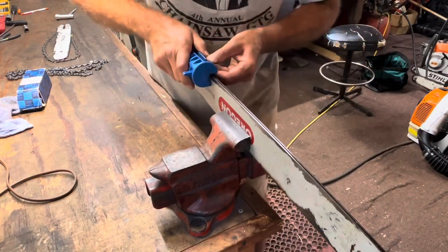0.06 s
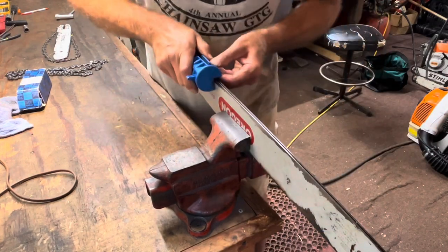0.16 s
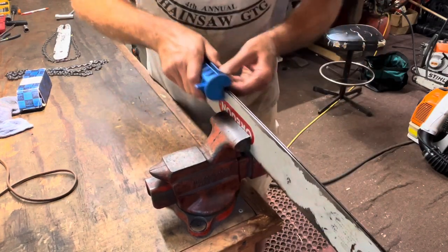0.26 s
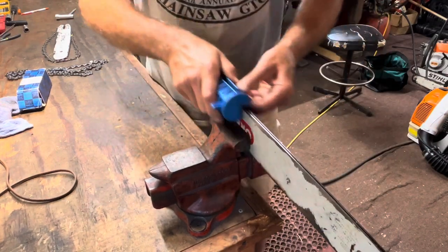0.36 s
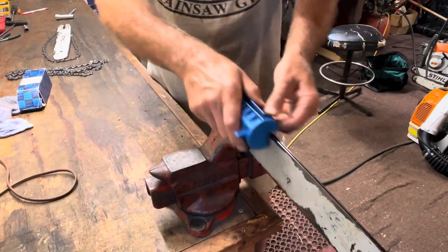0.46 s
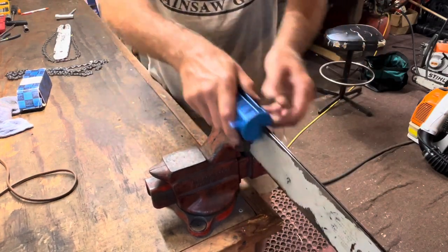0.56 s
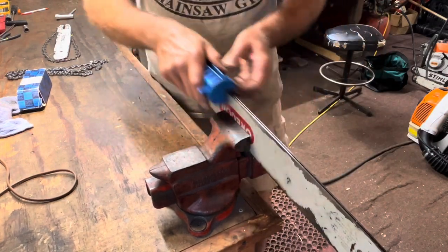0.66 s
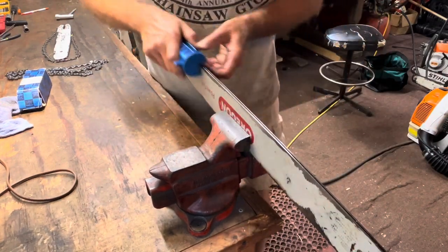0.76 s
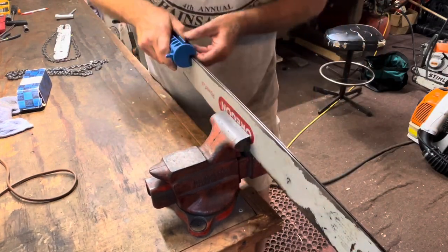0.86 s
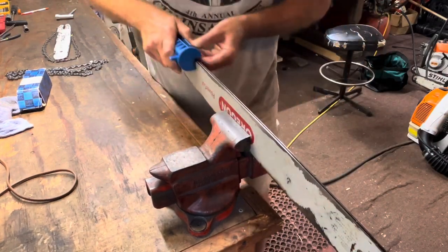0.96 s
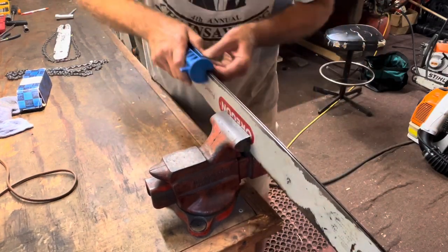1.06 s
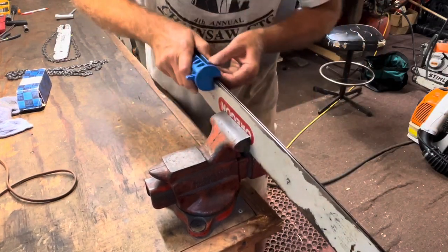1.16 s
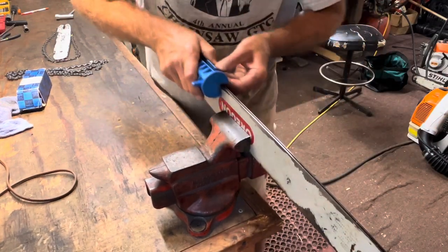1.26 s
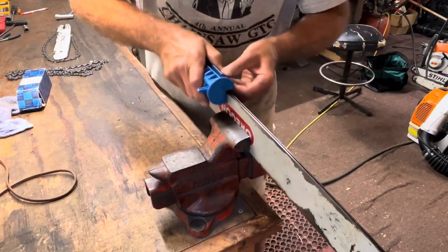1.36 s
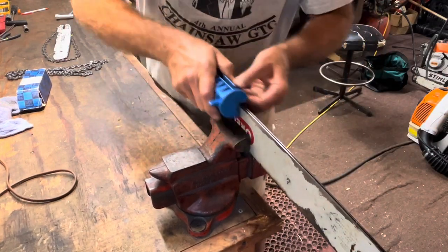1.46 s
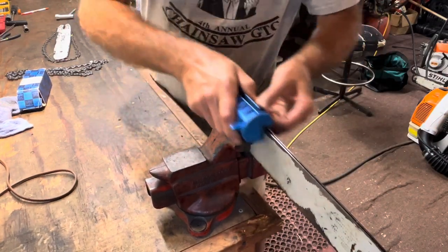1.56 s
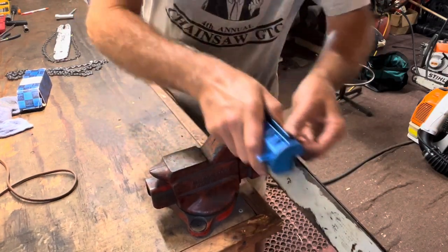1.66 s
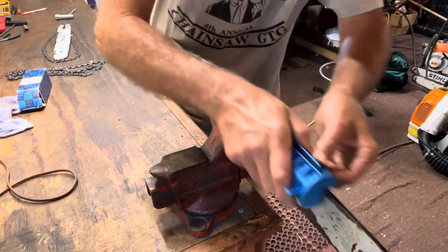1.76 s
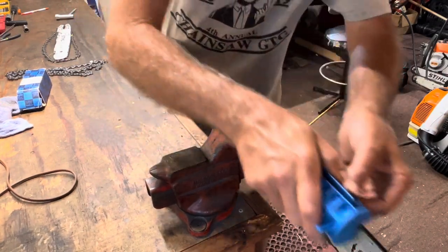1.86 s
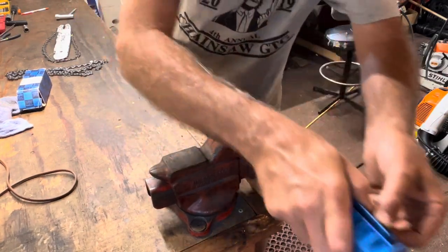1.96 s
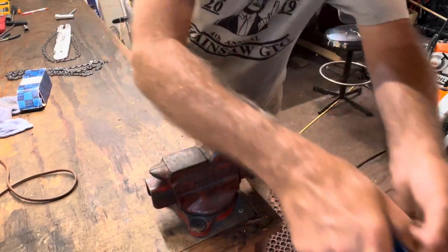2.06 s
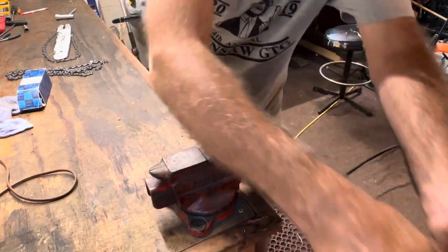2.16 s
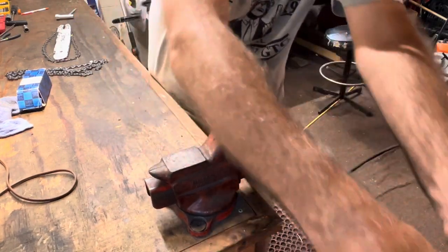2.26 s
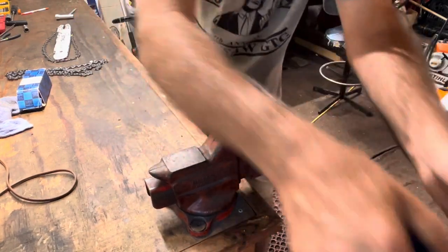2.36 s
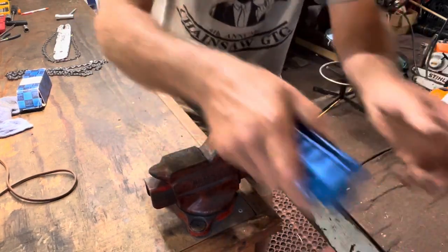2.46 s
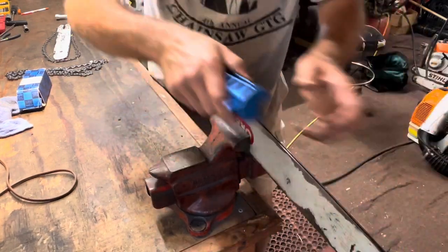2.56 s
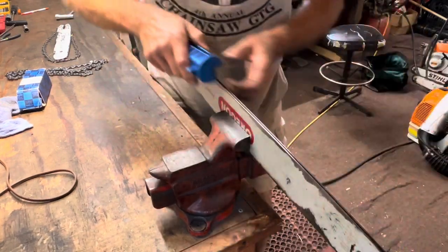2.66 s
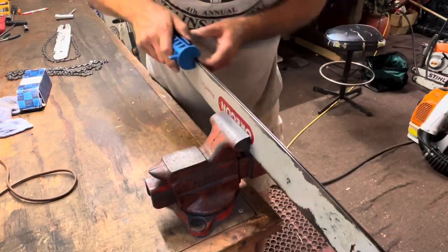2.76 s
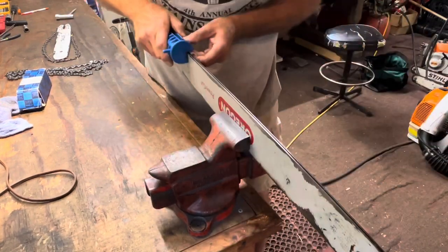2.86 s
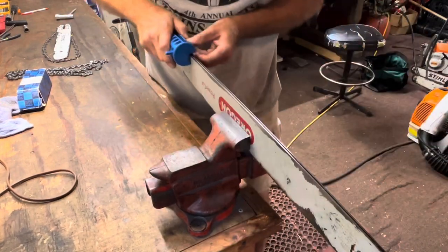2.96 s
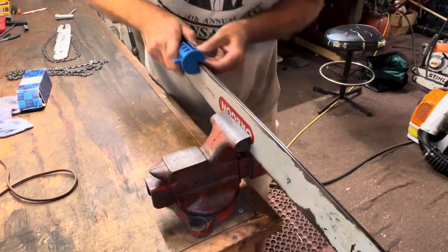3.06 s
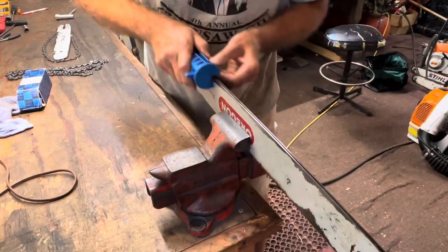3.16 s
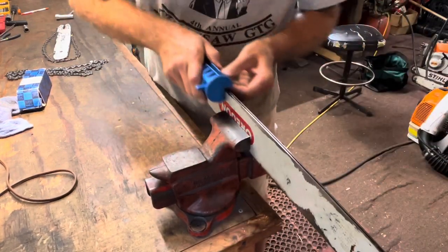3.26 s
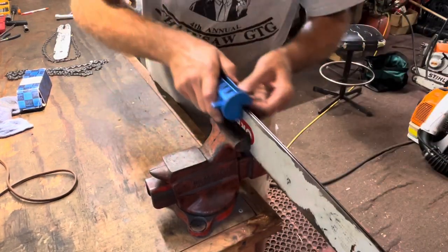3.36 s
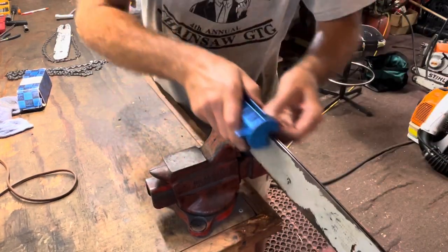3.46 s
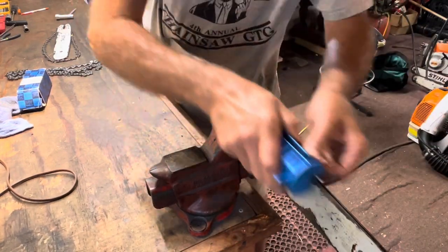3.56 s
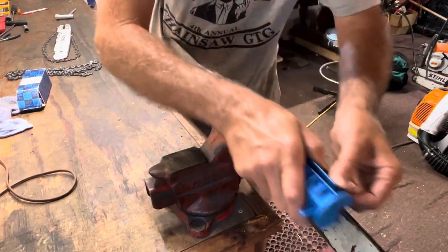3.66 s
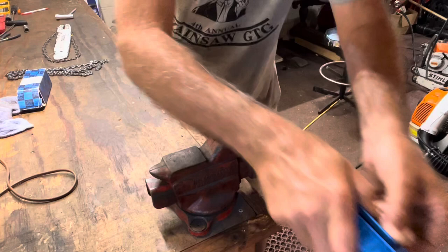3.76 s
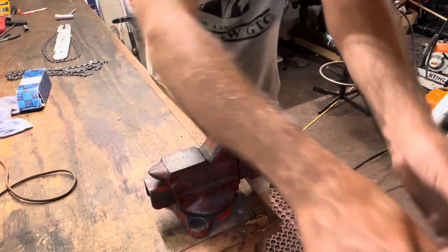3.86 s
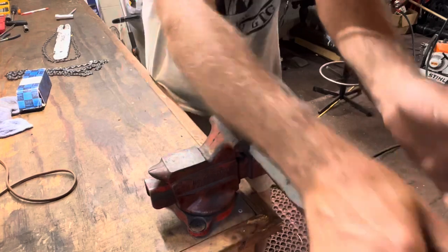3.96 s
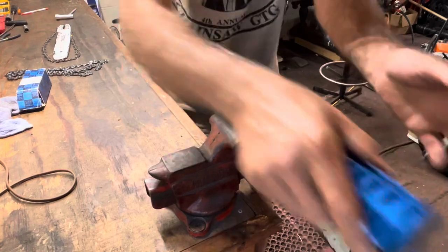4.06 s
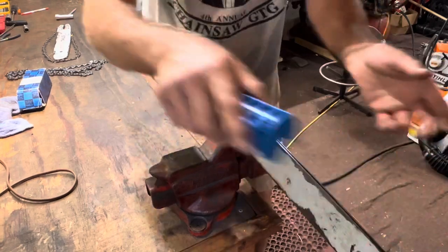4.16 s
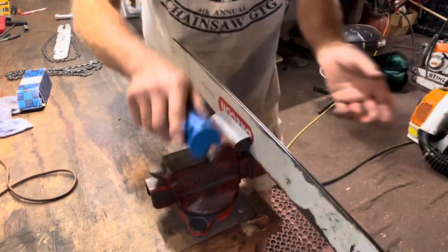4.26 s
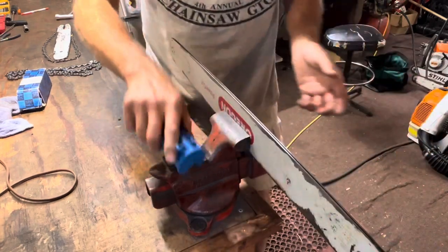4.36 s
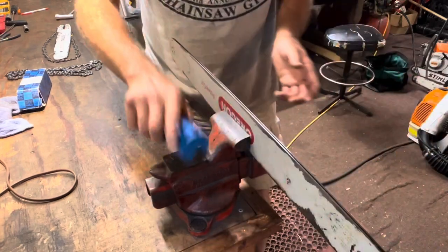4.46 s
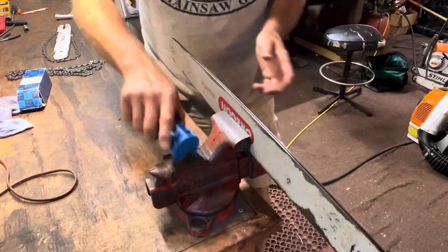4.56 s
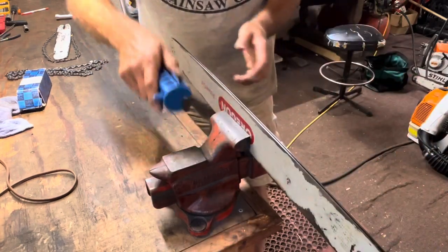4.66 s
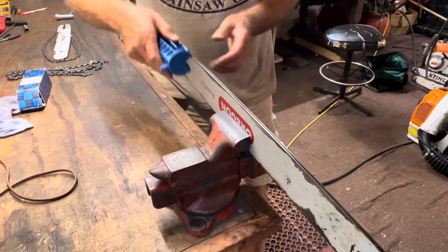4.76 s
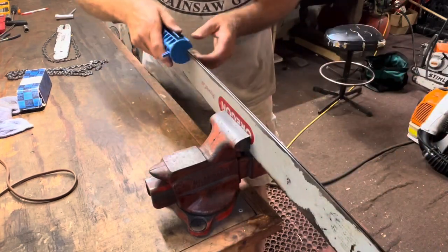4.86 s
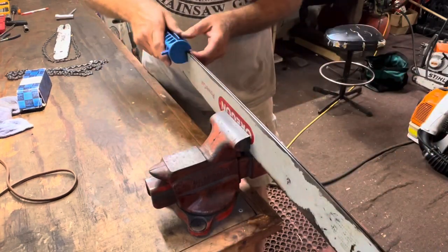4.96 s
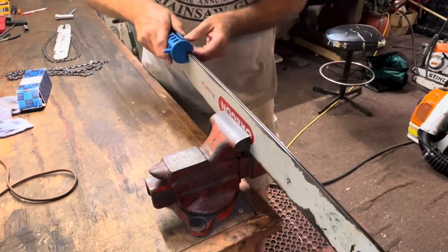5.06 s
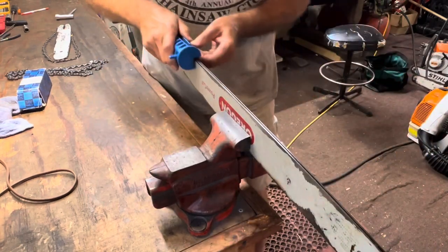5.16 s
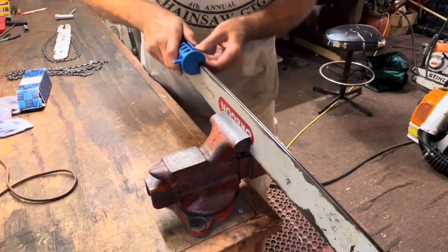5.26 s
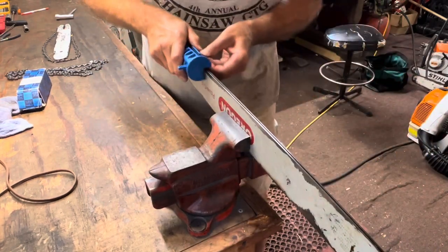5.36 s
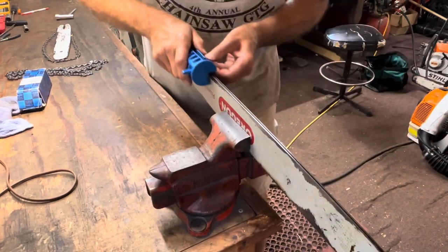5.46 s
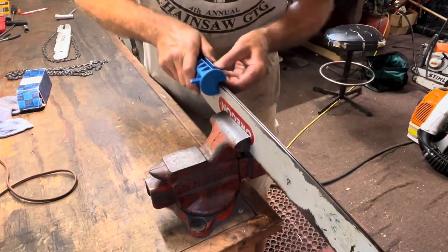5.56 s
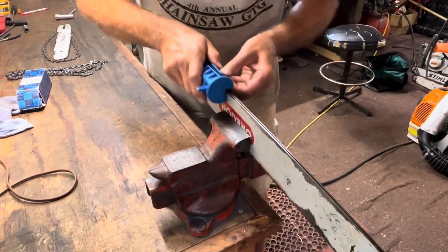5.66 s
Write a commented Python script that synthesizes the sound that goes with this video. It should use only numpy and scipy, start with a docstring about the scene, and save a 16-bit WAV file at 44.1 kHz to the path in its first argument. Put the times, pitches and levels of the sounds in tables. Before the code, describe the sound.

A file in a plastic jig rasps along a clamped chainsaw bar in short rubs and two long strokes, then knocks sharply twice on a vice.

```python
"""A file rasps in short rubs amid the drone of a small workshop, squealing where it skids without cutting.
Two long strokes follow; then its plastic jig is knocked twice on a bench vice and set back on the bar.
The jig is pushed along the edge of a chainsaw bar clamped in the vice, and a phone listens.
Random clicks make the teeth, wavering sines the squeals and hum, and impulses strike steel, jig and
bench, each a set of fading tones. Filtered noise makes the air and the rumble of the bench."""
import sys
import numpy as np
from scipy import signal
from scipy.fft import rfft, irfft
from scipy.io import wavfile
from scipy.ndimage import map_coordinates

SR = 44100
rng = np.random.default_rng(int(sys.argv[2]) if len(sys.argv) > 2 else 0)


def wrap_up_sound(samples):
    """Save the sound to the file named by the first command line argument, as 16-bit audio."""
    columns = np.atleast_2d(samples).T
    # keep every value between -1 and 1, then stretch to whole-number steps
    tamed = np.clip(columns, -1, 1)
    steps = np.round(tamed * 32767).astype(np.int16)
    wavfile.write(sys.argv[1], SR, steps)


N = 250968
TIME = np.arange(N) / SR
SIZE = 2 ** 19  # samples in each Fourier transform
FREQ = np.arange(SIZE // 2 + 1) * SR / SIZE

# Where the jig is. Each row: time in seconds, place along the bar from 0 (far end) to 1 (near end).
JIG_PLACE = [(.25, 0.24), (.5, 0.44), (.8, 0.14), (1.6, 0.31), (1.9, 0.66), (2.25, 0.92), (2.75, 0.077),
             (3.25, 0.35), (3.8, 0.64), (4.3, 0.065)]
# The jig taps the bar or hits the vice and chatters. Each row: time in seconds, drive of the crack in dB,
# drive of the bench thud in dB, drive of the plastic clack in dB, ring of the struck spot in Hz.
JIG_KNOCKS = [(0.917, -31, -45, -60, 2570), (2.444, -50, -56, -86.5, 3690), (2.823, -21.5, -54, -58, 3530),
              (2.835, -37, -45, -33, 2570), (3.974, -60.5, -42, -70, 2500), (4.246, -40.5, -74, -73, 3050),
              (4.3117, 2.5, -25, -33, 3156), (4.3142, -7.5, -44, -31.5, 2240),
              (4.3269, -12, -35, -37, 3280), (4.3331, -8, -54, -31, 3890), (4.341, -12.5, -35, -35.5, 2770),
              (4.4930, 0, -23.5, -15, 4300), (4.499, -6, -37.5, -25, 2670), (4.512, -12, -37, -45, 4800),
              (4.523, -23, -36, -25, 2560), (4.969, -14, -66, -49, 3440), (5.05, -34.5, -69, -50, 3430),
              (5.078, -20.5, -70, -66, 4190)]
# Tones of the clamped steel bar and vice. Each row: pitch in Hz, relative level in dB,
# time to fade by 60 dB in seconds.
STEEL_MODES = [(586, -10, 0.18), (886, -10, 0.4), (1170, -18.5, 0.78), (1284, -18, 0.45),
               (1420, -14.5, 0.35), (1770, -21, 0.25), (2197, 5, 0.11), (2565, 1, 0.17),
               (2614, 10.5, 0.039), (2790, -2.5, 0.045), (3300, -6.5, 0.2), (4370, 1.5, 0.13),
               (4670, -1.5, 0.14), (4910, -4.5, 0.1), (5200, -14, 0.14), (5580, -7, 0.051)]
# Tones of the wooden bench. Each row: pitch in Hz, relative level in dB, time to fade by 60 dB in seconds.
WOOD_MODES = [(134, 5, 0.16), (154, 2, 0.074), (185, -5.5, 0.3), (203.3, -10, 0.38), (239.6, -9, 0.12),
              (291, 5, 0.16), (380, -9.5, 0.16), (444.7, 2, 0.1), (544, 5, 0.061)]


def undb(db):
    """Turn decibels into a gain."""
    return 10 ** (np.asarray(db) / 20)


def unit(x):
    """Scale to an rms (average strength) of 1."""
    return x / np.sqrt(np.mean(x ** 2))


def curves(rows):
    """Join each column of a table by straight lines in time."""
    s, *columns = np.transpose(rows)
    return [np.interp(TIME, s, c) for c in columns]


def band(x, hz, kind, order=4):
    """Keep one part of the spectrum with a Butterworth filter."""
    return signal.sosfilt(signal.butter(order, hz, kind, fs=SR, output="sos"), x)


def colour(x, points):
    """Give a sound the spectrum outlined by (Hz, dB) points, with no sound ahead of its cause."""
    hz, db = np.transpose(points)
    log_gain = np.log(undb(np.interp(np.log(FREQ + 1), np.log(hz), db)))
    # doubling the first half of the cepstrum makes the filter react at once
    cepstrum = irfft(log_gain)
    response = np.exp(rfft(2 * cepstrum[:SIZE // 2], SIZE) - cepstrum[0])
    return irfft(rfft(x, SIZE) * response)[..., :N]


def convolve(x, response):
    """Pass a sound through an impulse response."""
    return signal.fftconvolve(x, response)[:N]


def walk(rate):
    """Smooth random wandering of spread 1 that changes course rate times a second."""
    return unit(map_coordinates(rng.standard_normal(8192), [TIME * rate], order=1, mode="wrap"))


def wavering_sine(hz):
    """A sine that follows a moving pitch."""
    return np.sin(2 * np.pi * np.cumsum(hz) / SR)


def ring(modes):
    """A struck body answers with a set of fading tones."""
    t = TIME[:SR]
    out = 0
    for hz, db, t60 in modes:
        out = out + rng.choice([-1, 1]) * undb(db - 60 * t / t60) * np.sin(2 * np.pi * hz * t)
    return out


def fade(t60):
    """One second of a decay that falls by 60 dB in t60 seconds."""
    return np.exp(-np.log(1000) * TIME[:SR] / t60)


def blows(times, db):
    """One impulse for each blow."""
    out = np.zeros(N)
    np.add.at(out, (np.asarray(times) * SR).astype(int), undb(db))
    return out


def catches(rate, spread_db):
    """Teeth catch and let go: dense clicks of uneven size, on average rate of them a second."""
    fired = rng.random(N) < rate / SR
    sizes = rng.standard_normal(N) * undb(spread_db * rng.standard_normal(N))
    return unit(fired * sizes / np.sqrt(rate))


def touch(start, length, attack_s=0.0011, release_s=0.00077):
    """Stick-slip sets in at once, holds and breaks off."""
    onset = np.clip((TIME - start) / attack_s, 0, 1)
    return onset * np.exp(-np.maximum(TIME - start - length, 0) / release_s)


def workshop(x, room_db, low_t60=0.27, high_t60=0.033, lead_s=0.00013, pan_db=0.5, count=1):
    """Direct sound from the jig's place, then dense reflections off bench, tools and walls.

    Moving arms and jig pass the sound through count patterns of reflections in turn."""
    shifts_per_s = 16
    side = 1 - 2 * curves(JIG_PLACE)[0]
    steps = TIME * shifts_per_s - np.arange(count)[:, None]
    apart = np.abs((steps + count / 2) % count - count / 2)
    shares = x * np.sqrt(np.maximum(1 - apart, 0)) if count > 1 else [x]
    low_fade, high_fade = fade(low_t60), fade(high_t60)
    out = []
    for sign in (1, -1):  # left, right
        heard = map_coordinates(x, [np.arange(N) + sign * side * lead_s * SR / 2], order=3)
        for share in shares:
            echoes = rng.standard_normal(SR)
            lows = band(echoes, 1900, "low", order=1)
            # the clutter soaks up the treble first
            tail = lows * low_fade + (echoes - lows) * high_fade
            tail = unit(tail * (TIME[:SR] > .002)) / np.sqrt(SR)
            heard = heard + undb(room_db) * convolve(share, tail[:SR // 2])
        out.append(heard * undb(sign * side * pan_db / 2))
    return np.array(out) / np.sqrt(1 + undb(2 * room_db))


def swell(start, length, attack_s, release_s):
    """The hand speeds up, holds and slows down again."""
    rise = np.clip((TIME - start) / attack_s, 0, 1)
    fall = np.clip((start + length - TIME) / release_s, 0, 1)
    return np.sin(np.pi / 2 * rise) * np.sin(np.pi / 2 * fall)


def effort(long_db=1.5, sway_db=.6, rub_attack_s=0.12, rub_release_s=0.1, lift_s=0.025):
    """How hard the file cuts and how much it hisses, over the short rubs and the long strokes."""
    # Short to-and-fro rubs. Each row: start in seconds, length in seconds, relative level in dB,
    # relative level of the fine hiss in dB.
    rubs = [(-.04, 0.065, -28.5, -53), (0.039, 0.32, -43.5, -63), (0.193, 0.16, -33.5, -45),
            (0.293, 0.22, -35.5, -54), (0.906, .26, -34.5, -53), (1.193, 0.15, -34.5, -50),
            (5.042, 0.24, -40, -59.5), (5.231, 0.13, -32, -51.5), (5.392, 0.21, -36.5, -54.5),
            (5.555, 0.19, -36.5, -53)]
    # Two long strokes, a list for each. Each row: time in seconds, relative bite of the file in dB.
    long_bites = [
        [(1.37, -41.5), (1.424, -36.5), (1.506, -41.5), (1.526, -37.5), (1.608, -39), (1.678, -32.5),
         (1.8, -38.5), (1.9, -37), (1.98, -32.5), (2.03, -33), (2.07, -36.5), (2.106, -31), (2.204, -32),
         (2.27, -79)],
        [(2.93, -57), (2.99, -46.5), (3.02, -41), (3.13, -38), (3.225, -42.5), (3.312, -37.5), (3.486, -43),
         (3.574, -33), (3.652, -41), (3.76, -32), (3.896, -34.5), (3.94, -94)],
    ]
    # Fine hiss in each long stroke. Each row: time in seconds, relative level in dB.
    long_hisses = [
        [(1.37, -53), (1.396, -55.5), (1.776, -52.5), (2.122, -54.5), (2.146, -49), (2.236, -62), (2.27, -73)],
        [(2.93, -71), (3.048, -53), (3.612, -53), (3.65, -56), (3.73, -48.5), (3.91, -55.5), (3.94, -86)],
    ]
    power = 0
    for s, length, *db in rubs:
        power = power + np.outer(undb(db), swell(s, length, rub_attack_s, rub_release_s)) ** 2
    for bite, hiss in zip(long_bites, long_hisses):
        start, end = bite[0][0], bite[-1][0]
        levels = undb(long_db) * undb(curves(bite) + curves(hiss))
        power = power + (levels * swell(start, end - start, lift_s, lift_s)) ** 2
    # the hand is a little unsteady
    return np.sqrt(power) * undb(sway_db * walk(24.38))


def end_echo(x, far_s=0.00115, near_s=0.000595, echo_db=-11, above_hz=4200):
    """Short waves come back from the bar's end, sooner as the file nears it: ridges glide upwards."""
    delay = np.interp(curves(JIG_PLACE)[0], [0, 1], [far_s, near_s])
    short_waves = band(x, above_hz, "high", order=2)
    echo = map_coordinates(short_waves, [np.arange(N) - delay * SR], order=1)
    return unit(x + undb(echo_db) * echo)


def patchy(x, depth_db=1.5, rate=14, count=28):
    """The contact point keeps moving, so different bands of the steel answer from moment to moment."""
    centres = np.log(np.geomspace(300, 14000, count))
    spectrum, log_freq = rfft(x, SIZE), np.log(FREQ + 1)
    out = 0
    for pick in np.eye(count):
        one_band = irfft(spectrum * np.interp(log_freq, centres, pick))[:N]
        out = out + one_band * undb(depth_db * walk(rate))
    return unit(out)


def rasp(gain_db=2.0, hiss_db=20.0, body_db=-5, body_slope=0.29, usual_db=-36, steel_db=-15.5,
         wood_db=-15, overhang_db=3.5, judder_db=2.0, chatter_db=1.58, slow_rate=2500, fast_rate=5000):
    """Teeth cut the bar's edge, faster as the arms stretch out; the hand judders, steel and bench ring."""
    # Outline of the rasp's spectrum. Each row: frequency in Hz, relative level in dB.
    rasp_outline = [(100, -18.5), (300, -12.5), (520, 4.5), (700, -2.5), (1050, -7.5), (1700, -3),
                    (2150, -2.5), (2600, -1.5), (3500, -0.5), (5000, -1), (6500, -6), (8000, -7),
                    (10000, -14), (12500, -17), (14000, -18), (16000, -68)]
    # The hollow resonance of the bar's free end: its lower and upper edge in Hz.
    overhang_hz = [2440, 2730]
    place = curves(JIG_PLACE)[0]
    teeth = catches(slow_rate + fast_rate * place, spread_db=1.0)
    teeth = teeth * undb(judder_db * walk(70) + chatter_db * walk(350))
    bite, hiss = effort() * undb(gain_db)
    cut = end_echo(colour(teeth, rasp_outline))
    cut = cut + undb(wood_db) * unit(convolve(teeth, ring(WOOD_MODES)))
    # far out from the vice the free end of the bar sounds hollower
    hollow = undb(overhang_db) * place
    cut = (cut + hollow * band(cut, overhang_hz, "band", order=1)) / (1 + hollow / 4)
    cut = patchy(cut)
    # fine chips hiss; a light touch sounds duller than a deep bite
    lows = signal.sosfiltfilt(signal.butter(2, 1200, fs=SR, output="sos"), cut)
    highs = signal.sosfiltfilt(signal.butter(2, 7000, "high", fs=SR, output="sos"), cut)
    lightness_db = np.minimum(usual_db - 20 * np.log10(bite + 1e-9), 20)
    tone = cut - lows - highs + lows * undb(body_db + body_slope * lightness_db)
    # the bar rings on faintly after the file has left it
    bar = ring(STEEL_MODES)
    ringing = convolve(teeth * bite, bar / np.linalg.norm(bar))
    return tone * bite + undb(hiss_db) * highs * hiss + undb(steel_db) * ringing


def bench(rock_hz=60.4, waver_hz=2, swing_s=0.042, shake_db=-14, rest_db=-56, rumble_db=-11,
          reach_db=-9, wood_db=-4, width=.2):
    """The bench shakes low and rocks under hard pushes; its top rumbles with the filing, less far out."""
    # Hard pushes that rock the bench. Each row: time of the widest swing in seconds, level in dB.
    pushes = [(.27, -33), (1.17, -39), (1.3, -36.5), (1.76, -40), (3.21, -35.5), (3.82, -34.5), (5.54, -34)]
    bite, _ = effort()
    bite = bite * undb(reach_db * curves(JIG_PLACE)[0])
    swing = undb(shake_db) * bite * walk(17)
    for s, db in pushes:
        swing = swing + undb(db) * np.exp(-((TIME - s) / swing_s) ** 2 / 2)
    rocking = unit(wavering_sine(rock_hz + waver_hz * walk(22.3)))
    mid, side = unit(band(rng.standard_normal((2, N)), [105, 250], "band", order=2))
    wood = unit(convolve(rng.standard_normal(N), ring(WOOD_MODES[:4])))
    boards = unit(mid + undb(wood_db) * wood) + width * np.outer([1, -1], side)
    return rocking * swing + boards * np.hypot(undb(rest_db), undb(rumble_db) * bite)


def hum(hum_hz=57.9, waver_hz=2, hum_db=-47, flutter_db=3):
    """A deep hum, a sine wavering in pitch and strength, fills the workshop."""
    return unit(wavering_sine(hum_hz + waver_hz * walk(22))) * undb(hum_db + flutter_db * walk(15))


def air(level_db=-50.5, wide_hz=700, low_hz=75):
    """Steady workshop noise, alike on both sides in the bass."""
    # Outline of the noise's spectrum. Each row: frequency in Hz, relative level in dB.
    air_outline = [(15, -31.5), (25, 15), (107, -11.5), (233, -34.5), (384, -17.5), (588, -26.5),
                   (879, -27.5), (1050, -30), (7400, -57.5), (7980, -73.5), (10000, -57), (13000, -94),
                   (22000, -120)]
    mid, side = colour(rng.standard_normal((2, N)), air_outline)
    both = mid + np.outer([1, -1], band(side, wide_hz, "high", order=1))
    return unit(band(both, low_hz, "high")) * undb(level_db)


def screeches(width=0.077):
    """The juddering teeth drive one narrow resonance of bar or file at a time: a rough, brief tone."""
    # Each row: start in seconds, length in seconds, level in dB, pitch in Hz.
    flares = [(0.287, 0.058, -44, 2730), (0.565, 0.031, -44, 3300), (0.636, 0.014, -36.5, 3400),
              (0.661, 0.047, -41, 3460), (0.739, 0.038, -42, 3450), (0.803, 0.06, -44, 3800),
              (0.957, 0.023, -45, 1630), (1.056, 0.046, -47, 2540), (1.22, 0.074, -49, 2550),
              (1.52, 0.022, -36.5, 2290), (1.653, 0.035, -41, 2880), (1.658, .05, -39, 6100),
              (1.985, 0.018, -32.5, 2780), (2.099, 0.0083, -27, 3840), (2.1, 0.028, -30, 2520),
              (2.132, 0.057, -37, 1835), (2.194, 0.0083, -40, 2500), (2.8, 0.017, -38, 3410),
              (3.076, 0.05, -41, 2580), (3.18, 0.068, -50, 2490), (3.413, 0.016, -38, 6300),
              (3.521, 0.032, -35.5, 6260), (3.75, 0.015, -35, 3400), (3.785, 0.024, -34, 5100),
              (3.83, 0.03, -52, 2380), (3.838, 0.043, -45, 1816), (3.871, 0.019, -35, 6420),
              (4.96, 0.0059, -40, 3330)]
    teeth = catches(4000, spread_db=3.5)
    edges = 1 + width * np.array([-.5, .5])
    out = np.zeros(N)
    for s, length, db, hz in flares:
        tone = unit(band(teeth, hz * edges, "band", order=2))
        out += touch(s, length, attack_s=0.0029, release_s=0.0074) * undb(db) * tone
    return out


def squeal(modes, waver, flutter_db):
    """Stick-slip locks on to the file's own tones, wavering in pitch and strength."""
    out = 0
    for hz, db in modes:
        strength = undb(db + flutter_db * walk(120))
        out = out + strength * wavering_sine(hz * (1 + waver * walk(250)))
    return unit(out)


def skids(shrill_from_db=-33.5, shrill_growth=0.51):
    """The file slides over the edge: a light scrape under a squeal, and a shrill one when pressed hard."""
    # The file skids instead of cutting. Each row: start in seconds, length in seconds,
    # scrape level in dB, squeal level in dB.
    slides = [(0.527, 0.056, -43.5, -49), (0.577, 0.048, -44.5, -42.5), (0.638, 0.13, -40.5, -34),
              (0.773, 0.087, -41.5, -49), (2.758, 0.03, -56.5, -83), (2.797, 0.015, -32.5, -25),
              (2.823, 0.015, -24.5, -27.5), (4.851, 0.043, -60, -86.5), (4.896, 0.15, -51, -80),
              (4.965, 0.0033, -27.5, -32.5), (5.075, 0.0039, -32.5, -34)]
    # Tones of the usual squeal. Each row: pitch in Hz, relative level in dB.
    usual_modes = [(6480, 2), (6580, 3), (10490, -3), (13020, -23.5)]
    # Tones of the shrill squeal under more pressure. Each row: pitch in Hz, relative level in dB.
    shrill_modes = [(5850, 12.5), (6200, 17), (6640, 11.5), (9210, 15), (13100, -3.5)]
    # Outline of the scrape's spectrum. Each row: frequency in Hz, relative level in dB.
    scrape_outline = [(100, -8.5), (500, 7), (1050, -2), (1800, 7.5), (3500, 4.5), (5000, 6.5), (6400, -7),
                      (7600, 7), (10500, -21.5), (12000, -7.5), (16000, -14)]
    scrape = unit(colour(catches(3000, spread_db=2.5), scrape_outline))
    usual = squeal(usual_modes, waver=0.004, flutter_db=2)
    shrill = squeal(shrill_modes, waver=0.01, flutter_db=3)
    out = np.zeros(N)
    for s, length, db, squeal_db in slides:
        # at shrill_from_db the shrill squeal equals the scrape; each dB above lifts it further
        shrill_db = db + shrill_growth * (db - shrill_from_db)
        sound = undb(db) * scrape + undb(squeal_db) * usual + undb(shrill_db) * shrill
        out += touch(s, length) * sound
    return out


def knocks(contact_t60=0.0029, rattle_t60=0.025, tick_db=1, contact_db=-7, rattle_db=-17, dull_hz=7500,
           steel_db=-35):
    """Hard plastic cracks against the vice, the file rattles dully in its jig, the steel rings briefly."""
    # Outline of the crack's spectrum. Each row: frequency in Hz, relative level in dB.
    crack_outline = [(80, -3.5), (250, 9.5), (520, 6.5), (800, 2.5), (1000, 5), (1400, 8.5), (1900, 0),
                     (2500, -9), (3200, 5.5), (4500, 11.5), (6500, 9), (8500, 1.5), (12000, -2),
                     (16000, -6)]
    s, force_db, *_ = np.transpose(JIG_KNOCKS)
    force = blows(s, force_db)
    contact = rng.choice([-1, 1], N) * convolve(force, fade(contact_t60))
    rattle = rng.standard_normal(N) * convolve(force, fade(rattle_t60))
    clatter = undb(contact_db) * contact + undb(rattle_db) * rattle
    clatter = band(clatter, dull_hz, "low", order=1)
    crack = colour(undb(tick_db) * force + clatter, crack_outline)
    return crack + undb(steel_db) * convolve(force, ring(STEEL_MODES))


def thuds(swell_s=0.015, bump_width=0.22, boards_db=-3, boards_t60=0.27):
    """The bench takes up each knock a moment later, in its tones and a dense clack; bumps stir few tones."""
    # Soft bumps against the bench. Each row: time in seconds, drive in dB, pitch in Hz.
    bumps = [(1.124, -31.5, 198), (2.851, -32.5, 153), (4.655, -31.5, 245), (4.975, -26, 175)]
    # The boards' dense clack: its lower and upper edge in Hz.
    boards_hz = [140, 397]
    s, _, thud_db, _, _ = np.transpose(JIG_KNOCKS)
    edges = 1 + bump_width * np.array([-.5, .5])
    force = blows(s, thud_db)
    for at, db, hz in bumps:
        force = force + band(blows([at], [db]), hz * edges, "band", order=2)
    boards = unit(band(rng.standard_normal(SR), boards_hz, "band", order=2))
    boards = undb(boards_db) * boards * fade(boards_t60)
    onset = 1 - np.exp(-TIME[:SR] / swell_s)
    return convolve(force, (ring(WOOD_MODES) + boards) * onset)


def clack(spot_db=3, spot_t60=0.0053):
    """The plastic jig gives each knock a short, hollow clack; the struck spot adds its own brief ring."""
    # Tones of the jig with the file in it. Each row: pitch in Hz, relative level in dB,
    # time to fade by 60 dB in seconds.
    jig_modes = [(565, 0, 0.012), (830, 1.5, 0.0051), (1330, 0, 0.013), (1930, -12, 0.011),
                 (2500, 2.5, 0.034)]
    s, _, _, clack_db, _ = np.transpose(JIG_KNOCKS)
    out = convolve(blows(s, clack_db), ring(jig_modes))
    for at, db, _, _, hz in JIG_KNOCKS:
        start = int(at * SR)
        out[start:start + SR] += ring([(hz, db + spot_db, spot_t60)])[:N - start]
    return out


def scene():
    """Filing, skids, knocks and bench in the droning workshop."""
    filing = workshop(rasp(), room_db=2, low_t60=0.25, high_t60=0.16, pan_db=2.5, count=9)
    background = bench() + hum() + air()
    skidding = workshop(skids() + screeches(), room_db=3.0, low_t60=0.25, high_t60=0.078, pan_db=2.5)
    cracking = workshop(knocks(), room_db=-1.5, low_t60=0.28, high_t60=0.13, pan_db=4.0, count=4)
    thudding = workshop(thuds(), room_db=-15.5, pan_db=-1.0)
    clacking = workshop(clack(), room_db=-13, pan_db=1.5)
    return filing + background + skidding + cracking + thudding + clacking


def record(dry):
    """The phone feeds both sides one treble signal, turned in phase, rounds the peaks and cuts the top."""
    # The stereo treble. Each row: frequency in Hz, phase by which left leads in radians.
    treble_phase = [(7500, -3.14), (8800, -3.14), (11000, -6.28), (13000, -6.28), (14500, -9.42)]
    top_hz = 15800
    left, right = rfft(dry, SIZE)
    # around 7300 Hz the right side hands over to the turned left signal
    shared = np.pi / 4 * (1 + np.tanh((FREQ - 7300) / 300))
    turned = left * np.exp(-1j * np.interp(FREQ, *np.transpose(treble_phase)))
    stereo = irfft([left, np.cos(shared) * right + np.sin(shared) * turned])[:, :N]
    return signal.sosfilt(signal.ellip(8, .2, 70, top_hz, fs=SR, output="sos"), np.tanh(stereo))


dry = scene()
out = record(dry)
wrap_up_sound(out)
```